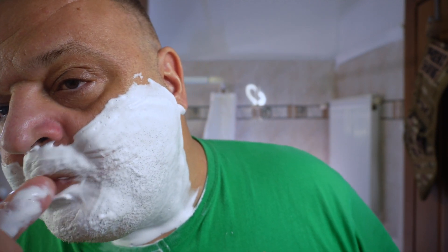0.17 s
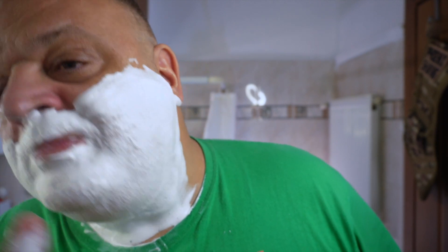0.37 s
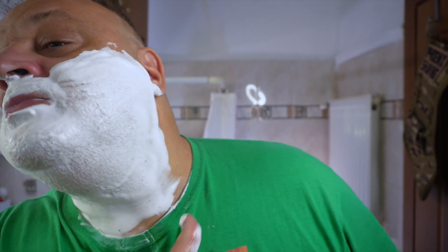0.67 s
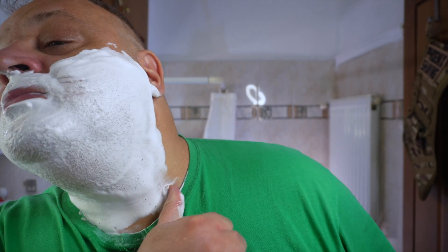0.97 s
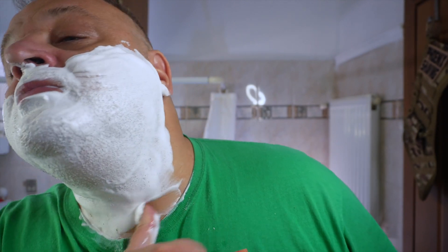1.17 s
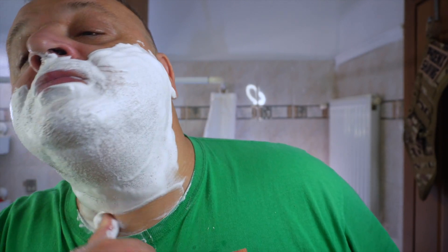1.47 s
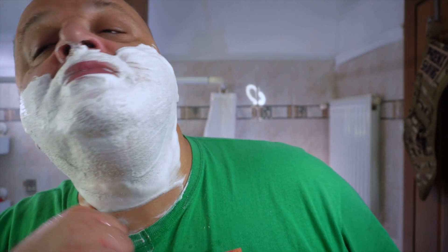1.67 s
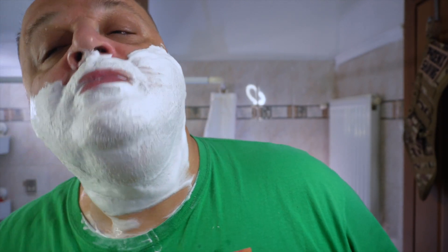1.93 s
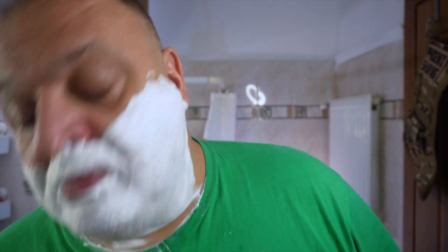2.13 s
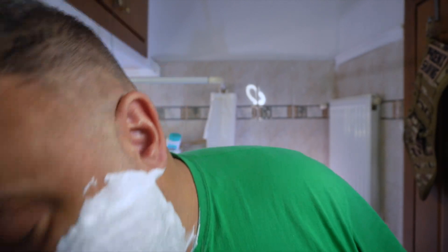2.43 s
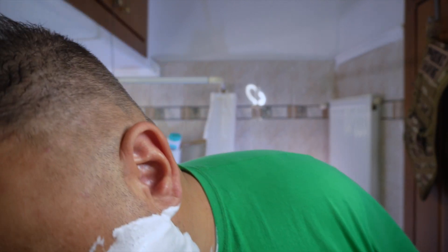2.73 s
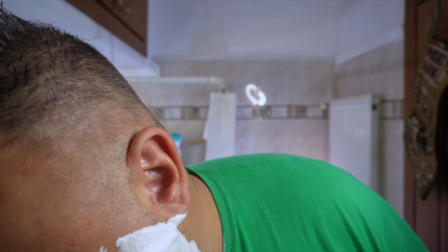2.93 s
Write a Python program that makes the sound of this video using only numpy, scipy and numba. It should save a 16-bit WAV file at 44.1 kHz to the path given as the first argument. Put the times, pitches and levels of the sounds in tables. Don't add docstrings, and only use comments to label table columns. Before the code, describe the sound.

Tap water runs into a ceramic sink throughout, a steady bright hiss with fizz, fine crackle and thin basin ringing. A sharp drop clicks at 0.3 s; more ticks and pings scatter, clustering around 1.4 s. A faint cabinet tap comes at 0.5 s, dull bumps near 1.1 and 3.05 s. Faint gurgle and rumble lie below. From 2.7 s the treble softens. Close stereo microphone, small tiled bathroom, short tail.

```python
import sys
import numpy as np
from scipy import signal
from scipy.fft import rfft, irfft
from scipy.io import wavfile
from scipy.ndimage import uniform_filter1d
from numba import njit

SR = 44100
rng = np.random.default_rng(int(sys.argv[2]) if len(sys.argv) > 2 else 0)


def volts(x):
    e = np.asarray(x, float) / 20
    return 10 ** e


def generate_wav(sig):
    pcm = np.round(np.clip(np.atleast_2d(sig).T, -1, 1) * 32767).astype(np.int16)
    wavfile.write(sys.argv[1], SR, pcm)


N = 136710
t = np.arange(N) / SR

# (frequency [Hz], density [dB])
RUMBLE_SPECTRUM = [(30, -5), (100, -11), (250, -15), (400, -7), (620, -13), (1000, -17), (1700, -10),
                   (2200, -43)]
# (frequency [Hz], width [Hz], level [dB])
DRAIN_MODES = [(280, 33, -10), (393, 64, -4.5), (490, 75, -2), (828, 170, -10), (1011, 120, -6.5),
               (1430, 470, -7.5)]
# (time [s], peak [dB], pitch [Hz], T60 [s])
CABINET_KNOCKS = [(.127, -63, 400, 0.24), (.0, -63.5, 444, 0.19), (.401, -63.5, 400, 0.12),
                  (.574, -70, 470, .08), (.62, -63, 472, 0.07), (1.072, -54, 420, 0.053),
                  (1.246, -61, 395, 0.1), (1.262, -58, 455, .13), (1.417, -57, 410, 0.09),
                  (1.355, -63, 420, .12), (1.31, -63, 450, .1), (2.047, -64.5, 404, 0.18),
                  (2.655, -58, 490, 0.092), (2.655, -58, 1060, 0.078), (2.815, -64, 142, 0.13),
                  (2.858, -62, 170, 0.09), (2.861, -64, 320, .08), (3.0905, -46, 385, .1),
                  (3.041, -48, 385, 0.14), (3.08, -45, 380.5, 0.07), (3.078, -56, 475, 0.12),
                  (3.078, -80, 280, 0.18)]
# (frequency [Hz], level [dB], T60 [s])
CABINET_TAP_MODES = [(499, 2.5, 0.12), (590, -4, .07), (750, 1, 0.09), (880, -5, .08), (1010, -9, .08),
                     (1180, -6, 0.08), (1330, -12, .07), (1497, -12, .08)]
# (start [s], length [s], level [dB], centre [Hz], width [Hz])
RUSTLE_EVENTS = [(0.418, 0.18, -65.5, 1550, 590), (0.56, 0.11, -65, 1100, 600),
                 (1.947, 0.47, -84.5, 770, 130), (2.891, 0.4, -75, 1520, 130), (2.08, .17, -75, 300, 200),
                 (2.18, 0.25, -74.5, 285, 80), (1.405, 0.055, -48, 5900, 1200),
                 (2.685, .12, -66, 1070, 130), (2.75, .22, -71, 1030, 200), (1.07, 0.26, -74.5, 1025, 70),
                 (2.815, 0.2, -73, 160, 80), (3.06, 0.08, -73, 150, 80), (2.92, .1, -74, 480, 80),
                 (2.62, .1, -68, 1300, 700), (.515, .13, -62, 950, 800), (2.895, .2, -70, 290, 50),
                 (2.8, 0.06, -73, 360, 170), (1.562, 0.04, -53, 4300, 1200), (1.28, .17, -74, 1020, 60)]
# (time [s], peak [dB], pitch [Hz])
DROP_EVENTS = [(.3112, -23.5, 6200), (0.325, -37, 6000), (.5594, -40, 5830), (0.6398, -35.5, 6280),
               (0.864, -35, 6200), (1.196, -34, 8100), (1.285, -35.5, 8550), (1.38, -30, 5750),
               (1.3824, -39, 4130), (1.4177, -33, 5600), (1.406, -37, 5800), (1.505, -37, 5800),
               (0.798, -38, 5730), (1.005, -37, 5750), (1.037, -38, 6340), (1.87, -36, 5820),
               (1.914, -37, 7070), (2.374, -36, 4640), (2.4354, -35, 7110), (2.898, -39, 4590),
               (3.016, -38, 5810), (1.577, -36, 4700), (2.738, -37, 7800), (1.4226, -31.5, 5900),
               (1.432, -35, 5700), (1.5642, -33.5, 4040), (1.573, -37, 4200), (2.2393, -31.5, 7900),
               (2.545, -36, 4400), (2.6244, -38, 3500), (2.6676, -35, 4000), (2.6988, -33, 8200),
               (2.8392, -36, 4850)]
# (time [s], peak [dB], pitch [Hz])
PING_EVENTS = [(0.3711, -45, 2040), (0.408, -43, 2060), (0.4828, -44, 2060), (0.5292, -44, 2020),
               (0.5447, -41, 2040), (0.594, -44, 2340), (0.7786, -42, 2040), (1.1074, -44, 2090),
               (1.2506, -44, 2050), (1.5788, -43, 2120), (1.7529, -43, 2370), (1.8642, -41, 2340),
               (2.1969, -44, 2330), (2.4638, -44, 2030), (2.4803, -43, 2100), (2.4914, -43, 2020),
               (2.6204, -41, 1940), (2.6569, -40, 1950), (2.811, -43, 2040), (2.8315, -41, 2030),
               (2.8644, -46, 2090), (2.8998, -43, 2090), (2.9517, -45, 2120), (2.9876, -46, 2090)]
# (frequency [Hz], density [dB])
SPRAY_COLOUR = [(1730, -20), (1880, -10), (2400, -10), (3300, -8), (5500, -3.5), (8200, -5.5), (9500, -7),
                (15500, -8.5)]
BASIN_MODE_HZ = [1953, 2051, 2115, 2340, 2680, 3060, 3715, 3996, 4433, 4747, 5145, 5860, 6357, 7900]
# (width [Hz], level [dB])
BASIN_MODE_WIDTH_DB = [(54, -3.5), (39.6, 6), (30.3, 2.5), (90, 1.5), (110, -6), (88, -1.5), (82, -4),
                       (45, 1), (55, 2.5), (89, 2), (28.3, 2.5), (142, 1.5), (90, 0.5), (600, -5.5)]
# (time [s], level [dB])
STRIKE_CURVE = [(0, -2.5), (.35, -2), (.55, 0), (.95, 2), (1.3, 0), (1.6, 2), (1.95, 1.5), (2.3, -2),
                (2.5, -1), (2.7, 0), (2.9, 0.5), (3.02, -8)]
# (time [s], level [dB])
BODY_SHADE = [(0, 0.5), (.3, 0.5), (.45, -0.5), (1.0, 0.8), (1.4, 0), (2.0, -.5), (2.58, .8), (2.68, -1.5),
              (2.76, -3.8), (2.85, -4), (2.97, -4.5), (3.1, -3.8)]
# (frequency [Hz], level [dB])
SIDE_SPECTRUM = [(100, -18), (700, -14), (1500, -16), (2200, -14.5), (4000, -8.5), (8000, -7),
                 (12000, -0.1), (16000, -1.5)]

RUMBLE_DB, GURGLE_DB, GURGLE_WALK_DB, GURGLE_WALK_PER_S = -78, -71.5, 1.8, 7.74
KNOCK_RISE_CYCLES, KNOCK_RAGGED_DB, KNOCK_SIDE_DB = 1.35, 1.2, -3
TAP_S, TAP_DB, TAP_RISE_CYCLES, TAP_CUT_HZ = .5125, -45.5, 0.95, 420
RAGGED_DB, RAGGED_PER_S = 2, 40
DROP_DB, DROP_T60_S, DROP_GLIDE, DROP_RISE_CYCLES, DROP_CUT_HZ = 1, 0.0093, 0.023, 0.41, 2130
SPLASH_DB, SPLASH_S = -13.5, 0.0084
PING_DB, PING_T60_S, PING_RISE_CYCLES = -1, .07, 4.5
SURGE_DB, SURGE_PER_S = .65, 12
SPRAY_DB, FLICKER_DB, FLICKER_PER_S, SWELL_DB, SWELL_PER_S = -44.2, .9, 14, .15, 2.48
FIZZ_DB, FIZZ_PER_S, FIZZ_CYCLES, FIZZ_GLIDE = -50.5, 3000, 7.8, 0.23
FIZZ_SCATTER_DB, FIZZ_TOP_DB = 4, 8.5
CRACKLE_DB, CRACKLE_PER_S, CRACKLE_CUT_HZ = -56, 400, 4400
CRACKLE_SCATTER_DB, CRACKLE_TOP_DB = 2, 12
BASIN_DB, PIPE_CUT_HZ, STRIKE_TOP_HZ = -50.5, 1764, 2500
SHADE_LOW_HZ, SHADE_HIGH_HZ, SHADE_AIR_HZ, SHADE_AIR_SHARE = 2280, 4000, 9800, 0.21
TILES_T60_S, TILES_GAP_S = 0.33, 0.0067
DROP_TILES_DB, KNOCK_TILES_DB, JET_TILES_DB = -2, -7, -15
BASS_CUT_HZ = 127


def level(x, db):
    return x * volts(db) / np.sqrt(np.mean(x ** 2))


def curve(points, hz):
    p = np.array(points, float)
    return np.interp(np.log(hz + 1), np.log(p[:, 0]), p[:, 1])


def over_time(points):
    return np.interp(t, *np.array(points).T)


def shape(x, gain):
    return irfft(rfft(x) * gain(np.arange(N // 2 + 1) * SR / N), N)


def resonate(x, hz, width_hz):
    return shape(x, lambda f: 1 / (1 + 2j * (f - hz) / width_hz) ** 2)


def high(x, hz):
    return signal.sosfilt(signal.butter(6, hz, "high", fs=SR, output="sos"), x)


def noise():
    return rng.standard_normal(N)


def walk(rate_per_s):
    hold = int(SR / rate_per_s)
    steps = np.repeat(rng.standard_normal(N // hold + 1), hold)
    return 1.66 * uniform_filter1d(uniform_filter1d(steps, hold), hold)[:N]


@njit
def rings(start, hz, t60_s, size, glide, rise_cycles, n, sr):
    out = np.zeros(n)
    for k in range(len(start)):
        m = int(t60_s[k] * sr)
        fall, a, phase = np.exp(-np.log(1000.) / m), size[k], 0.
        for i in range(min(m, n - start[k])):
            swell = np.sin(min(phase / rise_cycles / 4, np.pi / 2)) ** 2
            out[start[k] + i] += a * np.sin(phase) * swell
            phase += 2 * np.pi * hz[k] * (1 + glide * i / m) / sr
            a *= fall
    return out


def ring(rows, glide, rise_cycles):
    r = np.array(rows, float)
    start = (r[:, 0] * SR).astype(np.int64)
    return rings(start, r[:, 2].copy(), r[:, 3].copy(), volts(r[:, 1]), float(glide), float(rise_cycles), N, float(SR))


def tiles(x):
    u = np.arange(SR // 2) / SR
    tail = rng.standard_normal(len(u)) * 1000. ** (-u / TILES_T60_S) * (u > TILES_GAP_S)
    return signal.fftconvolve(x, tail / np.sqrt(np.sum(tail ** 2)))[:N]


def rumble():
    spectrum = [(5, -60), *RUMBLE_SPECTRUM, (4000, -97)]
    return level(shape(noise(), lambda f: volts(curve(spectrum, f))), RUMBLE_DB)


def gurgle():
    out = 0
    for hz, width_hz, db in DRAIN_MODES:
        wavering = noise() * volts(GURGLE_WALK_DB * walk(GURGLE_WALK_PER_S))
        out = out + volts(db) * resonate(wavering, hz, width_hz)
    return level(out, GURGLE_DB)


def rustles():
    out = 0
    for start_s, length_s, db, hz, width_hz in RUSTLE_EVENTS:
        attack = np.clip((t - start_s) / .015, 0, 1)
        release = np.clip((start_s + length_s - t) / (.8 * length_s), 0, 1)
        gate = attack * release * volts(RAGGED_DB * walk(RAGGED_PER_S))
        out = out + gate * level(resonate(noise(), hz, width_hz), db)
    return out


def knocks():
    soft = ring(CABINET_KNOCKS, 0, KNOCK_RISE_CYCLES) * volts(KNOCK_RAGGED_DB * walk(RAGGED_PER_S))
    tap_rows = [(TAP_S, TAP_DB + db, hz, t60_s) for hz, db, t60_s in CABINET_TAP_MODES]
    return soft + high(ring(tap_rows, 0, TAP_RISE_CYCLES), TAP_CUT_HZ)


def drops():
    burst = sum(volts(db) * (t > s) * np.exp(-abs(t - s) / SPLASH_S) for s, db, hz in DROP_EVENTS)
    splash = burst * level(resonate(noise(), 6000, 4250), SPLASH_DB)
    bubble_rows = [(s, db + DROP_DB, hz, DROP_T60_S) for s, db, hz in DROP_EVENTS]
    return high(splash + ring(bubble_rows, DROP_GLIDE, DROP_RISE_CYCLES), DROP_CUT_HZ)


def pings():
    rows = [(s, db + PING_DB, hz, PING_T60_S) for s, db, hz in PING_EVENTS]
    return high(ring(rows, 0, PING_RISE_CYCLES), PIPE_CUT_HZ)


def spray(surge_db):
    out = 0
    for hz in 1500 * 2 ** (np.arange(11) / 3):
        band = shape(noise(), lambda f: np.sqrt(np.clip(1 - 3 * abs(np.log2((f + 1) / hz)), 0, 1)))
        flicker_db = FLICKER_DB * walk(FLICKER_PER_S) + SWELL_DB * walk(SWELL_PER_S)
        out = out + band * volts(surge_db + flicker_db)
    return out


def droplets(per_s, scatter_db, top_db, low_hz, span_hz):
    draw = rng.random((int(per_s * N / SR), 3))
    db = np.minimum(-scatter_db * np.log(draw[:, 2] + 1e-9), top_db)
    return draw[:, 0] * N / SR, db, low_hz + span_hz * draw[:, 1]


def fizz(surge_db):
    s, db, hz = droplets(FIZZ_PER_S, FIZZ_SCATTER_DB, FIZZ_TOP_DB, 1700, 13000)
    return volts(2 * surge_db) * ring(np.c_[s, db, hz, 3 * FIZZ_CYCLES / hz], FIZZ_GLIDE, 1)


def crackle(surge_db):
    s, db, hz = droplets(CRACKLE_PER_S, CRACKLE_SCATTER_DB, CRACKLE_TOP_DB, 5000, 7000)
    clicks = high(ring(np.c_[s, db, hz, 4 / hz], 0, 0.9), CRACKLE_CUT_HZ)
    return level(clicks, CRACKLE_DB) * volts(2 * surge_db)


def basin(surge_db):
    def modes(f):
        power = 0
        for hz, (width_hz, db) in zip(BASIN_MODE_HZ, BASIN_MODE_WIDTH_DB):
            power = power + volts(2 * db) / (1 + (2 * (f - hz) / width_hz) ** 2) ** 2
        return np.sqrt(power)

    ringing = level(high(shape(spray(surge_db), modes), PIPE_CUT_HZ), BASIN_DB)
    low = shape(ringing, lambda f: f < STRIKE_TOP_HZ)
    return ringing + low * (volts(over_time(STRIKE_CURVE)) - 1)


def body_shade(flow):
    shade_db = over_time(BODY_SHADE)
    treble = shape(flow, lambda f: np.clip((f - SHADE_LOW_HZ) / (SHADE_HIGH_HZ - SHADE_LOW_HZ), 0, 1))
    flow = flow + treble * (volts(shade_db) - 1)
    air = shape(flow, lambda f: np.clip(2 * (f / SHADE_AIR_HZ - 1), 0, 1))
    return flow + air * (volts(SHADE_AIR_SHARE * shade_db) - 1)


def jet(surge_db):
    def tint(x):
        return shape(x, lambda f: volts(curve([(900, -60), *SPRAY_COLOUR], f)))

    flow = level(tint(spray(surge_db)), SPRAY_DB) + level(tint(fizz(surge_db)), FIZZ_DB)
    flow = body_shade(flow + crackle(surge_db) + basin(surge_db))
    return flow + volts(JET_TILES_DB) * tiles(flow)


def scene():
    surge_db = SURGE_DB * walk(SURGE_PER_S)
    ticks = drops() + pings()
    blows = knocks() + rustles()
    mid = rumble() + gurgle() + jet(surge_db)
    mid = mid + ticks + volts(DROP_TILES_DB) * tiles(ticks)
    mid = mid + blows + volts(KNOCK_TILES_DB) * tiles(blows)
    side = rumble() + gurgle() + jet(surge_db) + tiles(ticks + volts(KNOCK_SIDE_DB) * blows)
    side = shape(side, lambda f: volts(curve(SIDE_SPECTRUM, f)))
    return np.array([mid + side, mid - side])


def band_limit(x):
    return signal.sosfilt(signal.butter(12, 15790, fs=SR, output="sos"), x)


def record(dry):
    mix = signal.sosfilt(signal.butter(2, BASS_CUT_HZ, "high", fs=SR, output="sos"), dry)
    return band_limit(mix)


dry = scene()
out = record(dry)
generate_wav(out)
```